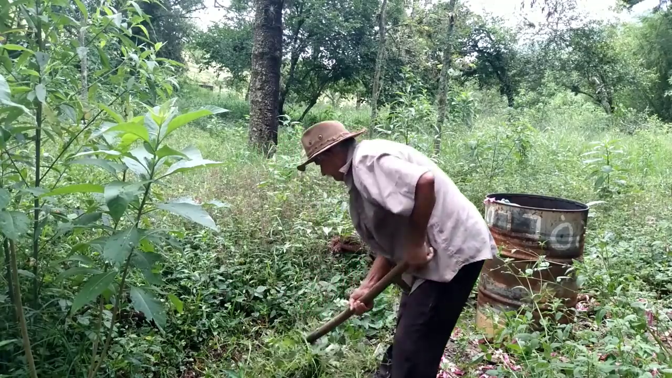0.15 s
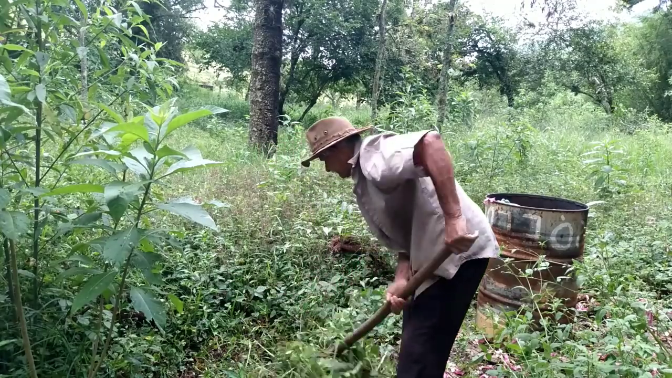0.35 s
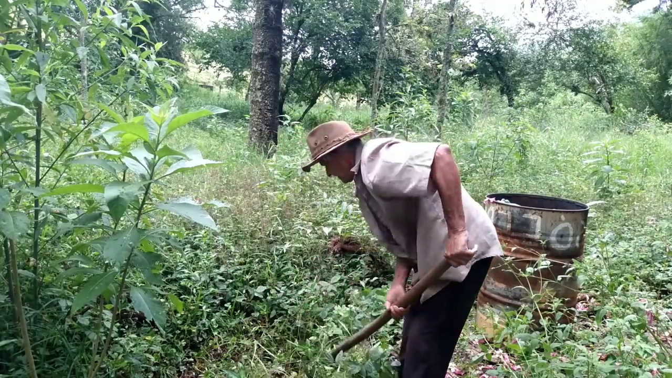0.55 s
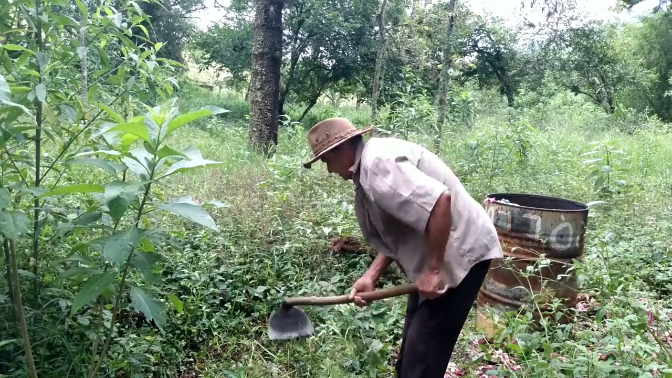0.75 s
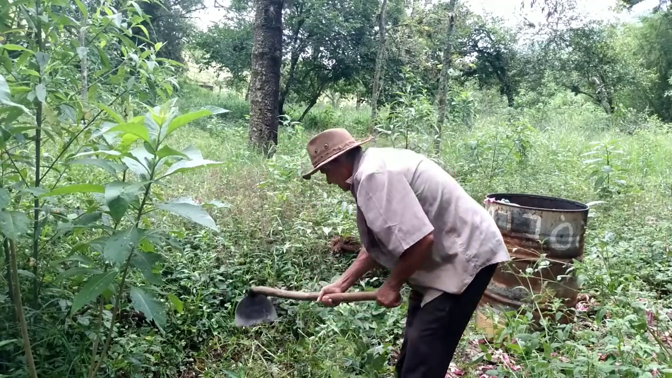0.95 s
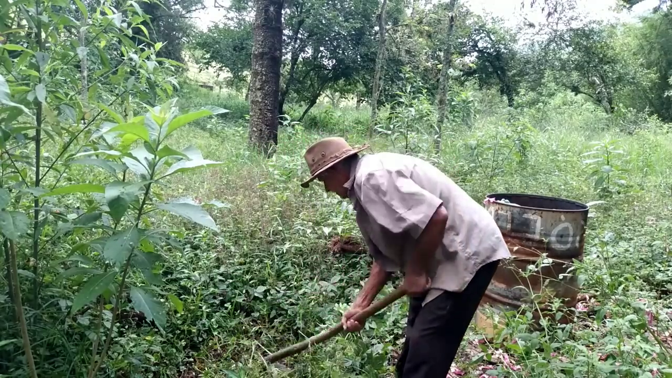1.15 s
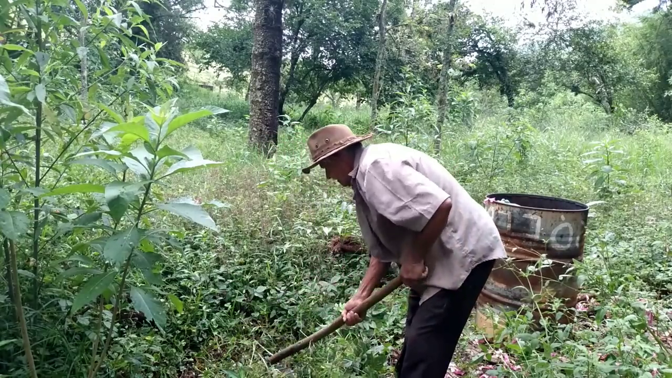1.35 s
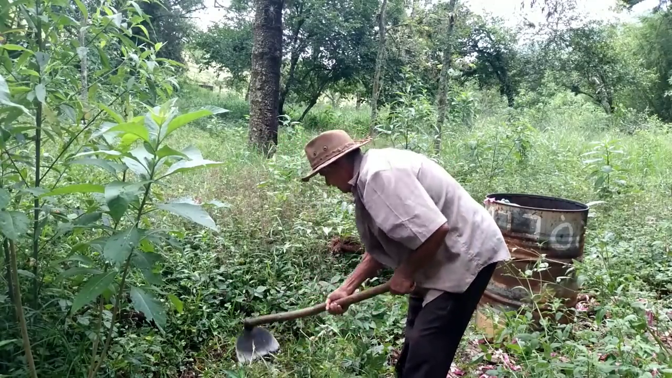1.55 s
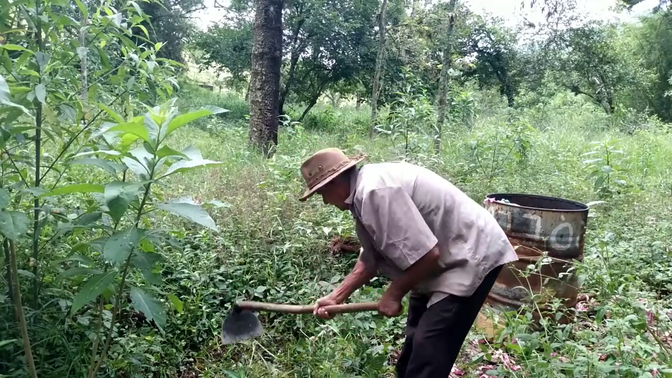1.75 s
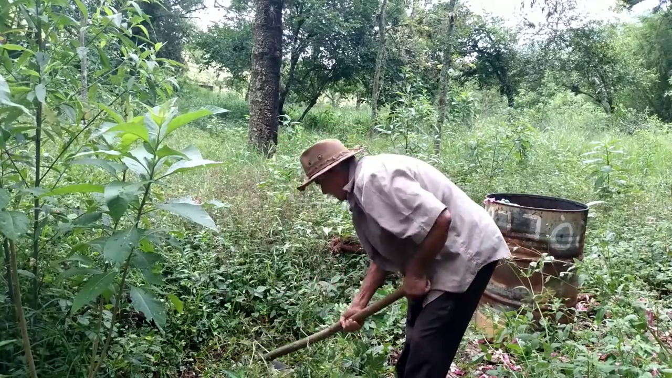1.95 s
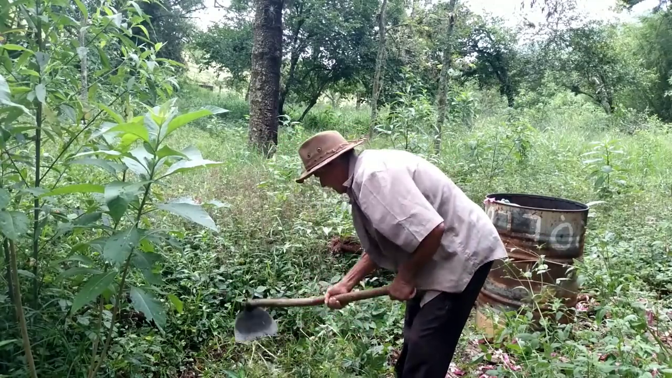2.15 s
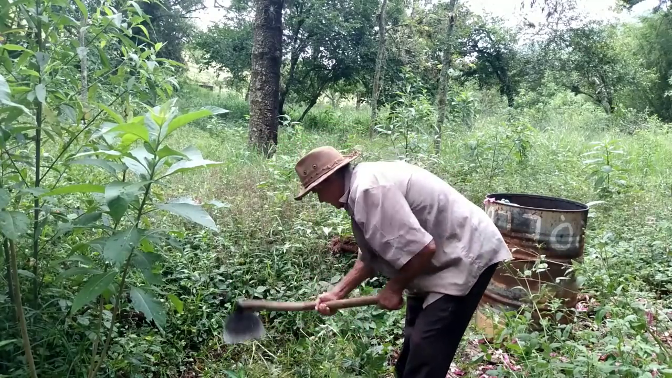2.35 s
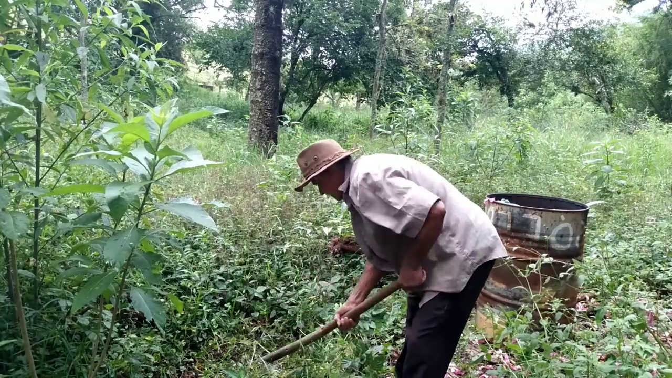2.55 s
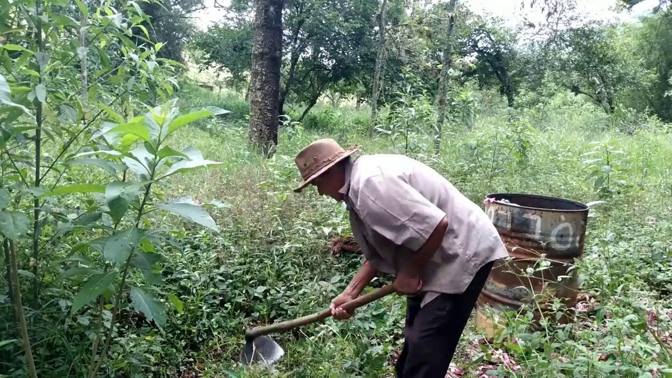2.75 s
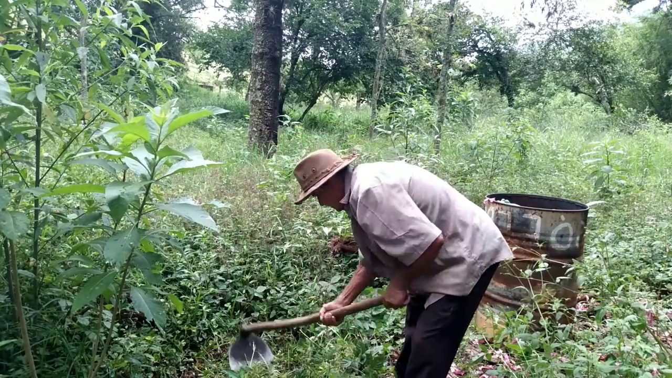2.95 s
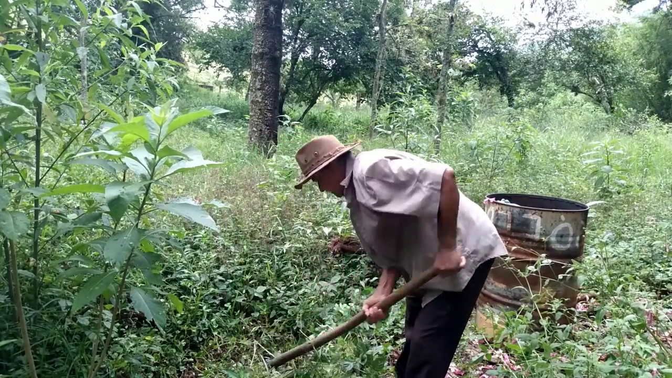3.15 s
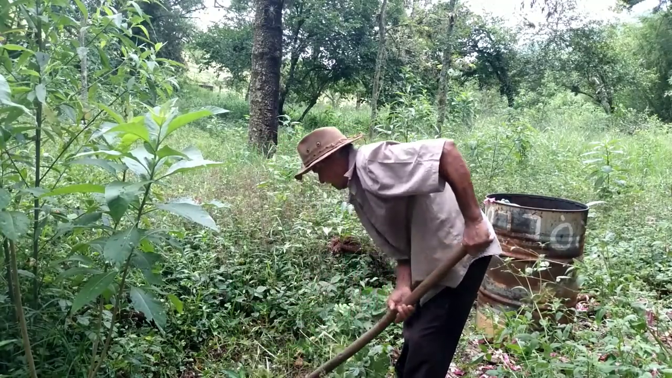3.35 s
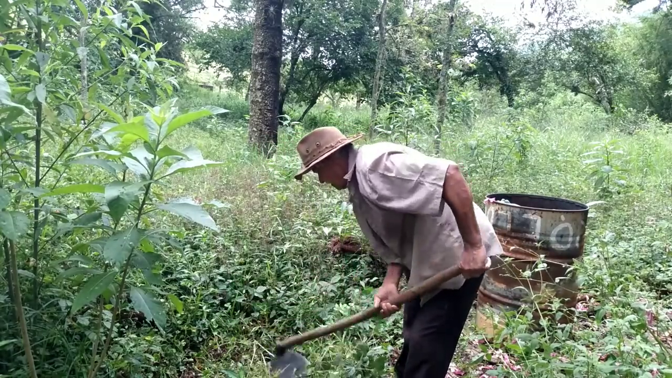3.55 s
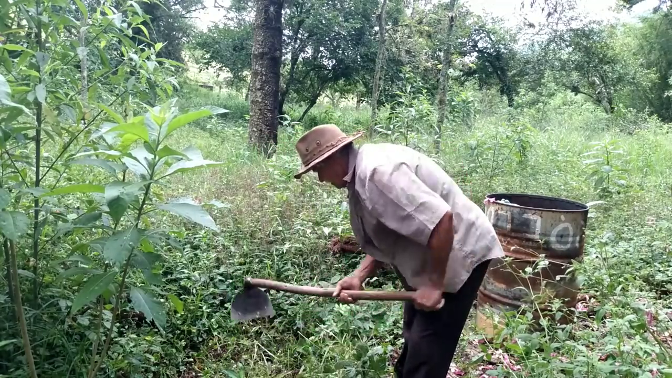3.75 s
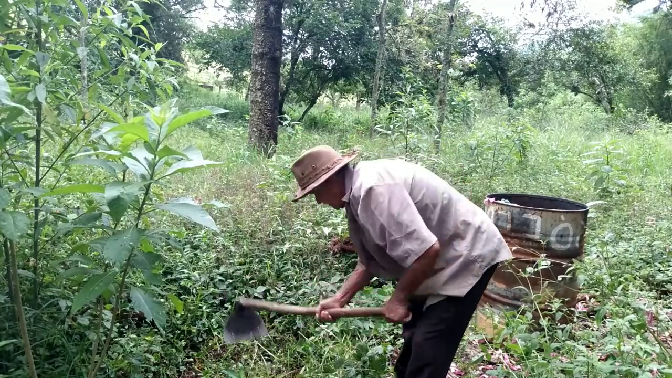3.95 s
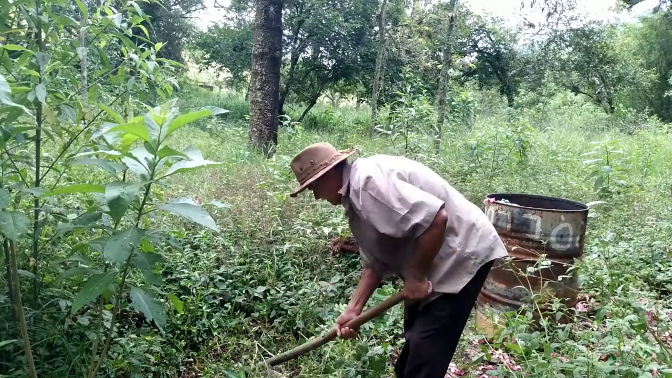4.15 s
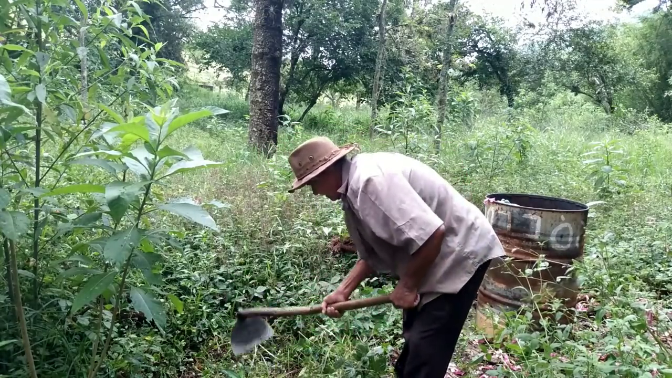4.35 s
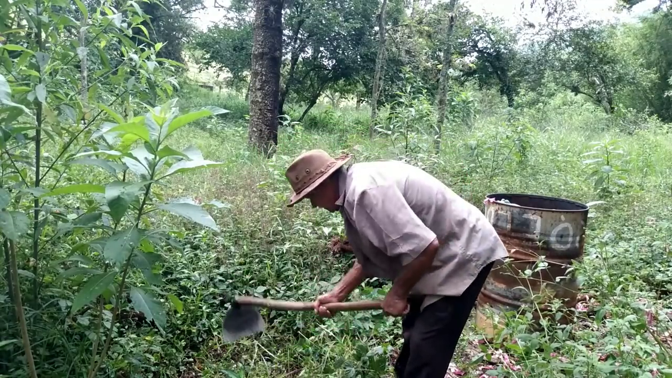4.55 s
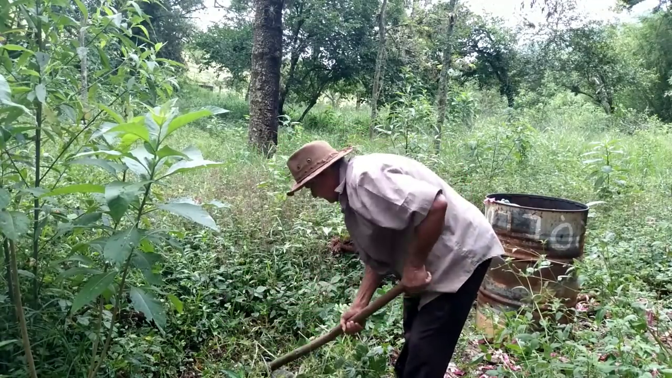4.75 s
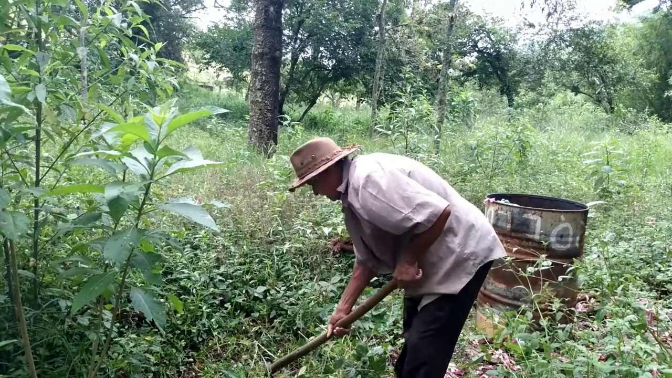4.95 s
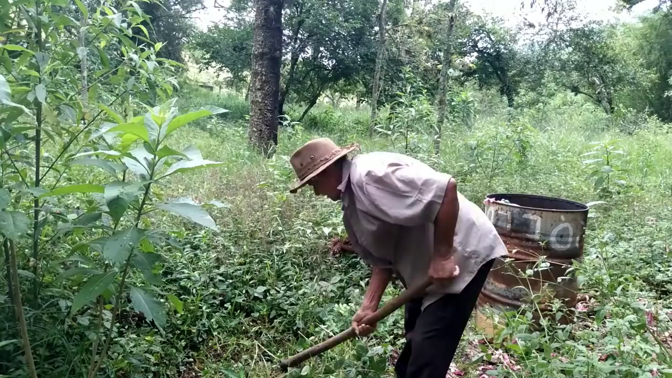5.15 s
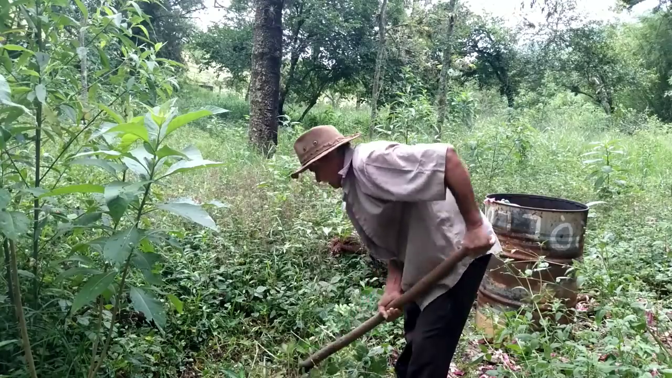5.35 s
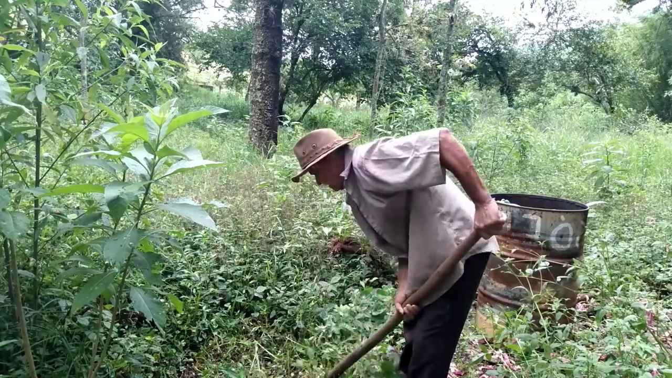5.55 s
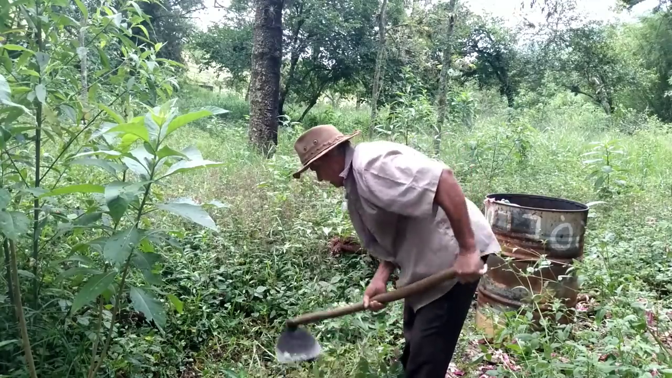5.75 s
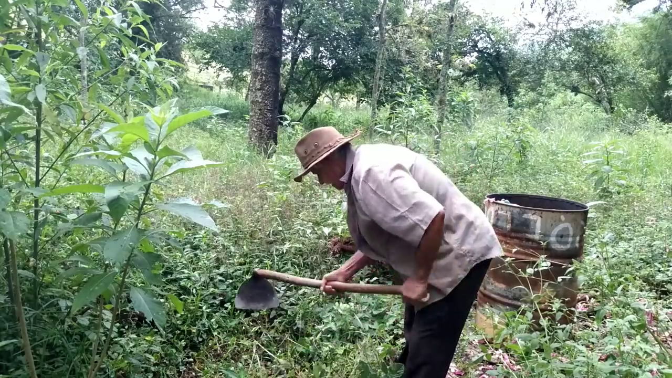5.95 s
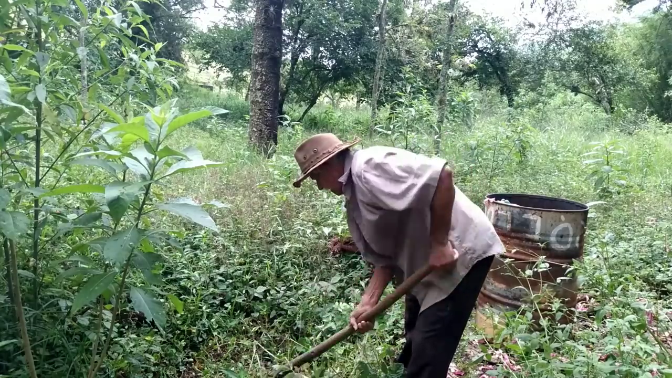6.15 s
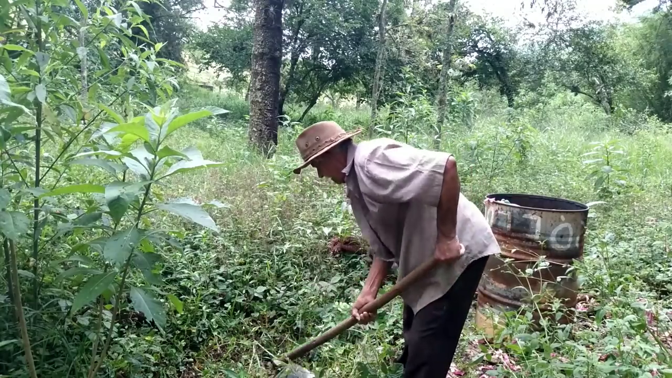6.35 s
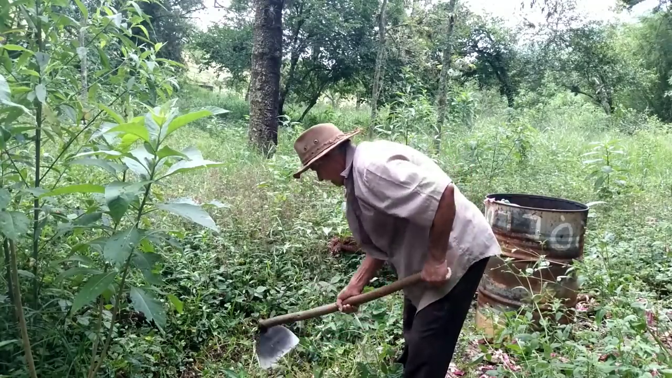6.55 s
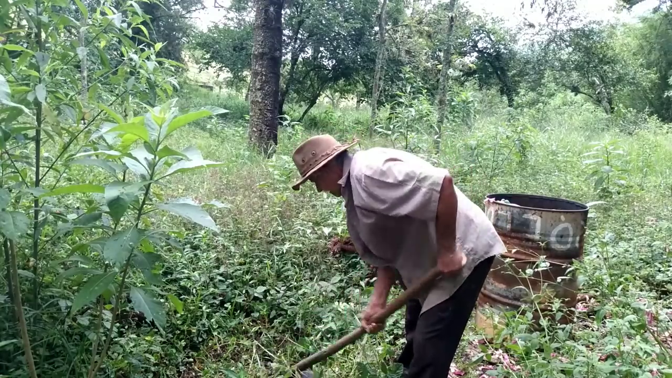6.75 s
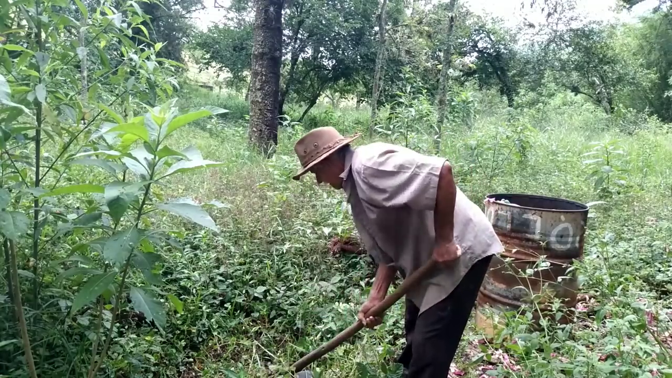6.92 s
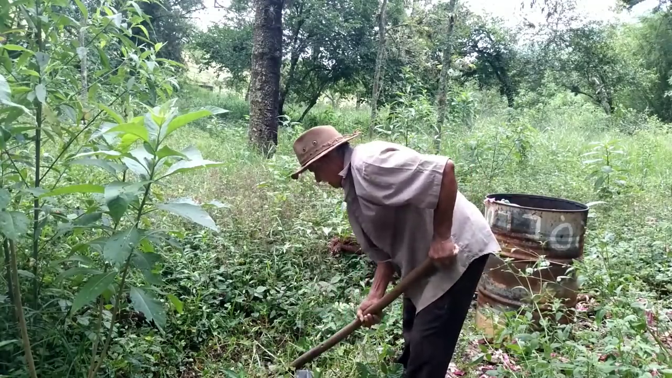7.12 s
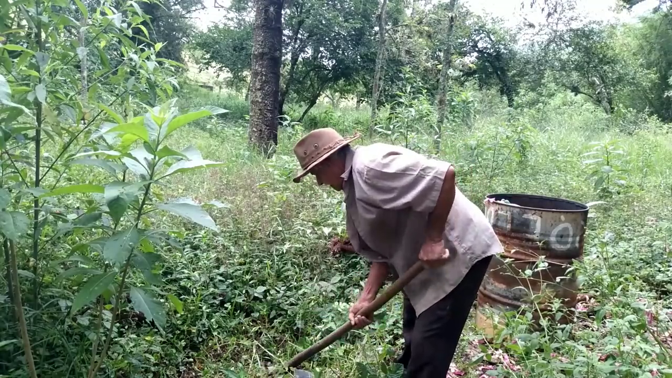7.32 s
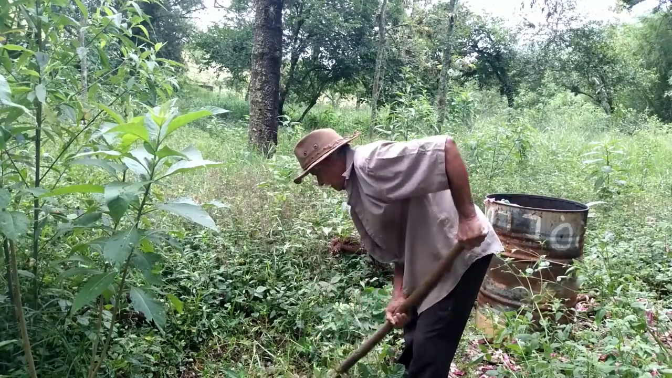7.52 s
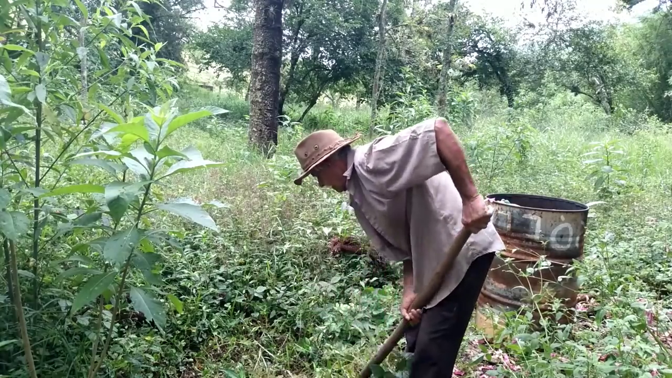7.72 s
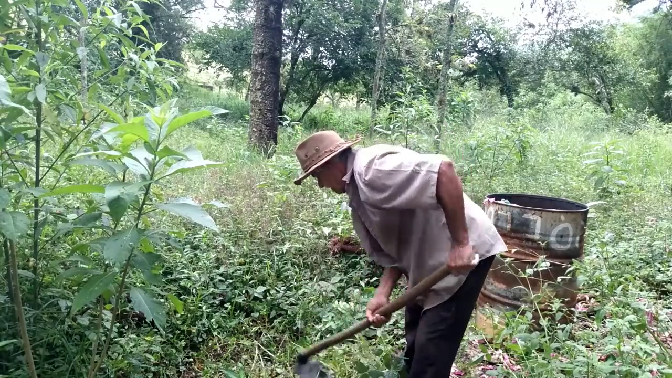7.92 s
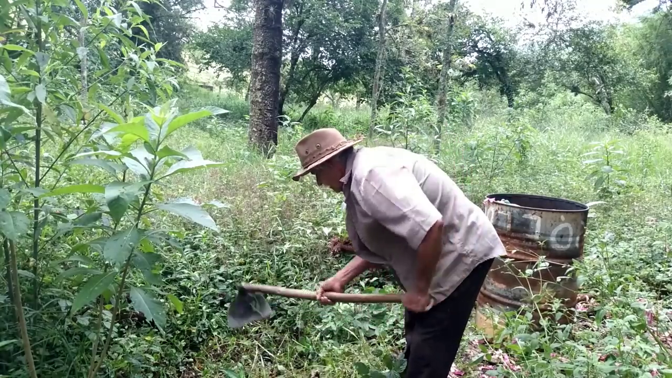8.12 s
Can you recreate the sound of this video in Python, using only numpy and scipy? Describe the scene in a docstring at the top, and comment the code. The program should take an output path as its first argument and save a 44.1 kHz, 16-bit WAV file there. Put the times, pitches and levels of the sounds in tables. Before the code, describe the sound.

Outdoors among weeds, a nearby hoe chops into damp earth seven times at an uneven pace, knocking, clanking and scattering crumbs of soil. Before, between and after the chops, the blade makes four softer grating drags through leaves, snapping stems and clinking on stones. Steady, quiet insects and a low murmur of air fill the background, with a barely audible distant bird early on.

```python
"""A hoe chops weeds out of damp soil at the edge of a wood: seven blows and four raking pulls.
Each blow swishes through grass, cuts stems, thuds, rings the head and shaft, and scatters earth.
On the pulls the blade grates through soil and leaves; stems snap, stones clink, dry stalks tick.
Behind it insects shrill, a far bird whistles and the air murmurs.
The two microphone ports colour the treble differently."""
import sys
import numpy as np
from scipy import signal
from scipy.fft import rfft, irfft, next_fast_len
from scipy.io import wavfile
from scipy.ndimage import map_coordinates

SR = 44100
rng = np.random.default_rng(int(sys.argv[2]) if len(sys.argv) > 2 else 0)


def generate_wav(sig):
    """Save sig (samples, or channels by samples) to the path in sys.argv[1] as 16-bit PCM at SR."""
    pcm = np.round(np.clip(np.atleast_2d(sig).T, -1, 1) * 32767).astype(np.int16)
    wavfile.write(sys.argv[1], SR, pcm)


N = 360738

# Noise colours, from the background bed to the blow. Each row: frequency in Hz, relative level in dB.
AIR_COLOUR = [(8, 15.5), (30, -0.5), (70, -3.5), (130, -11.5), (230, -8), (330, -14), (520, -14),
              (700, -21.5), (1100, -27.5), (4000, -25), (9000, -26.5), (16000, -27)]
CHORUS_COLOUR = [(3800, -41), (4600, -18), (5300, -5.5), (5900, -4), (6500, -10.5), (7500, -16.5),
                 (9000, -12.5), (12000, -19.5), (16000, -40.5)]
SCRAPE_COLOUR = [(40, -9), (200, -1.5), (400, -3), (550, -2), (1050, -4.5), (1350, -6), (1650, -4.5),
                 (2600, -8), (5000, -13.5), (12000, -47)]
LEAF_COLOUR = [(200, -22.5), (1200, -7), (2000, -2.5), (3200, 1), (5000, -0.5), (7500, -3.5), (10500, -8.5),
               (13000, -22.5), (16000, -30.5)]
STEM_COLOUR = [(300, -16), (1500, -10), (2700, -1), (4000, 0.5), (5500, -4), (7500, -3.5), (10000, -11),
               (13000, -26), (16000, -26)]
PUSH_COLOUR = [(40, -8.5), (90, 1), (150, -9.5), (270, -1.5), (420, -13), (700, -24), (2000, -59)]
EARTH_COLOUR = [(40, -17), (120, -11.5), (260, -4), (420, -7), (700, -7.5), (1100, 1.5), (1350, -15),
                (1650, -4.5), (2800, -9.5), (5000, -26), (12000, -48.5)]
# Stereo image of close and distant sounds. Each row: frequency in Hz, left-right coherence (1 is mono).
NEAR_IMAGE = [(130, 1), (640, 0.91), (1400, .78), (3000, 0.44), (6000, 0), (10000, 0.047)]
FAR_IMAGE = [(30, .4), (200, 0.27), (550, 0.69), (1200, .05), (4000, 0.01)]
# Swell of the higher insects and the chorus. Each row: time in seconds, base level in dB.
INSECT_SWELL = [(0, -59), (.9, -57.5), (1.599, -60), (2.8, -57.5), (4.4, -59.5), (5, -59), (5.9, -59),
                (6.6, -59.5), (7.2, -58.5)]
# The blade drags through the weeds. Each row: start in seconds, length in seconds, level in dB.
BLADE_PULLS = [(0, .35, -45), (3.032, 0.22, -42), (5.046, 0.39, -44.5), (7.404, 0.19, -45)]
# The blade lifts out of the tangle. Each row: release in seconds, leaf level in dB, ring level in dB.
BLADE_LIFTS = [(.65, -50, -60.5), (2.06, -63.5, -59), (3.56, -50.5, -59), (5.7, -53, -59),
               (6.49, -53.5, -74), (7.99, -47.5, -74)]
# Modes of the free blade and of the head damped by soil.
# Each row: pitch in Hz, relative level in dB, time to fall 60 dB in seconds.
FREE_MODES = [(638, -4, 0.58), (858, 5.5, 0.16), (1228, -1.5, 0.43), (1624, 0.5, 0.17), (2200, 2, 0.41),
              (2893, 4.5, .3), (3230, -0.5, .3), (6500, 5, 0.2)]
DAMPED_MODES = [(1080, 0, 0.022), (1207, -5, 0.026), (1519, 7.5, 0.032), (1564, 5, 0.024),
                (2076, -8, 0.063), (2396, -3, 0.053), (2530, -14.5, .05), (2619, -7, 0.051),
                (3484, -3.5, 0.039), (3890, -17, 0.016), (4370, -17.5, 0.06), (4580, -7.5, 0.06),
                (7100, -23, 0.024)]
# Sharp cracks: stems and roots break, the hoe knocks twice more just after its second blow, and clods drop
# after later blows. Each row: start in seconds, level in dB, crispness in dB.
CRACKS = [(.023, -43, -5), (1.908, -16.5, -12.5), (1.918, -23, -14.5), (1.951, -30, -10.5),
          (3.063, -32.5, -2.5), (3.081, -32.5, -1), (4.862, -45.5, -10), (5.103, -33.5, 3),
          (5.173, -34, -1), (5.255, -43.5, -4.5), (5.328, -38, 2.5), (6.23, -38, 1), (6.348, -48, -1),
          (6.816, -34.5, 10.5)]
# The blade meets a stone. Each row: start in seconds, crack level in dB, crispness in dB,
# ring level in dB, most excited frequency in Hz.
STONE_HITS = [(.049, -40.5, -3.5, -43.5, 1160), (1.982, -34, 1, -42, 4598), (2.516, -36, 4, -45, 782),
              (3.088, -25.5, -2.5, -47, 700), (4.736, -39, -2, -51, 820), (5.352, -36.5, 7.5, -41, 1520),
              (6.197, -33.5, -4, -45, 855), (7.448, -37.5, 1, -43.5, 894), (8.079, -58.5, 9, -53.5, 1150)]
# Bird notes. Each row: start in seconds, length in seconds, first and last pitch in Hz, level in dB.
BIRD_NOTES = [(0.974, 0.23, 4400, 3350, -71), (1.5, 0.11, 4120, 3350, -67), (2.284, 0.16, 4400, 3380, -67)]
# Hoe blows. Each row: start in seconds, force in dB, depth from 0 to 1, then swish, stem, thud and
# shaft faders in dB, knock pitch in Hz, clod pitch in Hz, clod fader in dB.
BLOWS = [(1.136, -22, 0.62, -29.5, -19, -27, -29, 267, 944, -32),
         (1.897, -15, 0.5, -30.5, -14.5, -19, -15.5, 207, 1055, -16),
         (2.471, -14.5, .15, -33.5, -15.5, -21, -13, 149.4, 747, -16.5),
         (4.071, -14, .3, -26, -14, -23, -16.5, 170, 986, -27.5),
         (4.685, -18.5, .8, -22.5, -20.5, -9.5, -18, 204, 1099, -21.5),
         (6.1495, -13.5, .7, -29, -10, -17, -32.5, 210, 847, -12),
         (6.7874, -16, 0.99, -26, -12, -15, -16, 196.6, 727, -7.5)]
# Dry stalks tick. Each row: start in seconds, level in dB, pitch in Hz.
STALK_TICKS = [(6.891, -45.5, 7100), (6.949, -45, 7170), (7.013, -46.5, 4240), (7.035, -44, 4150),
               (7.176, -55, 2440), (7.229, -51, 2390)]
# Treble resonances of the microphone ports. Each row: frequency in Hz, gain in dB.
LEFT_PORT_EQ = [(3800, 1.5), (6000, 3.5), (7250, 10.5), (9000, -0.5), (10500, -11), (12500, -0.5),
                (15000, 2.5)]
RIGHT_PORT_EQ = [(3800, 1), (6000, -1.5), (7300, -3), (9000, -3), (10400, 7), (12500, 1.5), (15000, -1)]


def amp(db):
    """Decibels to gain."""
    return 10 ** (np.asarray(db) / 20)


def unit(x):
    """Scale to rms 1."""
    return x / np.sqrt(np.mean(x ** 2) + 1e-20)


def along(points, hz):
    """Read a curve of (Hz, value) points on a log frequency axis."""
    freqs, values = np.transpose(points)
    return np.interp(np.log(hz + 1), np.log(freqs), values)


def wobble(rate):
    """A smooth random curve with rate knots a second."""
    knots = rng.standard_normal(int(N * rate / SR) + 4)
    return map_coordinates(knots, [np.arange(N) * rate / SR])


def filtered(x, response):
    """Shape x with a gain given as a function of frequency."""
    n = x.shape[-1]
    padded = next_fast_len(n + SR // 8)
    return irfft(rfft(x, padded) * response(np.fft.rfftfreq(padded, 1 / SR)), padded)[..., :n]


def noise(colour, image=NEAR_IMAGE, n=N, texture=1):
    """Stereo noise of rms 1 with the given colour, stereo image and fine texture."""
    def mid_side_gains(hz):
        width = np.arccos(np.clip(along(image, hz), -1, 1)) / 2
        return amp(along(colour, hz)) * [np.cos(width), np.sin(width)]
    mid, side = filtered(rng.standard_normal((2, n)) * texture, mid_side_gains)
    return unit(np.array([mid + side, mid - side]))


def crackle(colour, rate, spread_db, n=N, life_s=.0008):
    """Tiny fractures, rate a second, a few much larger than the rest."""
    sizes = amp(spread_db * np.minimum(rng.exponential(size=n), 4))
    fractures = sizes * (rng.random(n) < rate / SR)
    power = signal.lfilter([1], [1, -np.exp(-1 / (life_s * SR))], fractures ** 2)
    return noise(colour, n=n, texture=np.sqrt(power))


def burst(t, rise, hold, t60):
    """An envelope that rises, holds and dies away; times in seconds."""
    return (1 - np.exp(-np.maximum(t, 0) / rise)) * amp(-60 * np.maximum(t - hold, 0) / t60)


def ring(t, hz, t60, rise=.0014):
    """One struck mode."""
    return np.sin(2 * np.pi * hz * t) * burst(t, rise, 0, t60)


def add(track, start, sound):
    """Mix a sound into the track at start seconds."""
    i = max(round(start * SR), 0)
    track[:, i:i + sound.shape[-1]] += sound[..., :N - i]


def air():
    """A low, wide bed of air that barely wavers."""
    return amp(-47.5 + .31 * wobble(2)) * noise(AIR_COLOUR, FAR_IMAGE)


def shrill(hz, width_hz, flutter_db):
    """Many insects of one kind merge into a narrow, fluttering band."""
    band = filtered(rng.standard_normal((2, N)), lambda f: 1 / (1 + 2j * (f - hz) / width_hz) ** 2)
    return unit(band * amp(flutter_db * wobble(45)))


def insects():
    """Two kinds of insect sing over a distant chorus, which swells and ebbs with the higher kind."""
    swell = amp(np.interp(np.arange(N) / SR, *np.transpose(INSECT_SWELL)))
    lower = amp(-58 + 1.6 * wobble(.86)) * shrill(4805, width_hz=380, flutter_db=1.5)
    higher = amp(2.5) * shrill(5750, width_hz=480, flutter_db=2.1)
    chorus = amp(-1.5) * noise(CHORUS_COLOUR, FAR_IMAGE)
    return lower + swell * (higher + chorus)


def on_steel(x, width_hz=45, wet=.16):
    """Grit sliding on the blade sounds its modes, widened by the contact."""
    def resonances(f):
        return sum(amp(db) / (1 + 2j * (f - hz) / width_hz) for hz, db, _ in FREE_MODES)
    return filtered(x, lambda f: 1 + wet * resonances(f))


def pulls(grip_s=.016, gather_db_per_s=20, lift_db_per_s=34, lift_t60=.44):
    """The blade grates over soil while leaves pile up and rustle; lifted free, it rings."""
    t = np.arange(N) / SR
    soil, leaves, rings = np.zeros(N), np.zeros(N), np.zeros((2, N))
    for start, length, db in BLADE_PULLS:
        gathered_db = gather_db_per_s * np.minimum(t - start - length, 0)
        soil += amp(db) * burst(t - start, grip_s, length, t60=.65)
        leaves += amp(db + 4 + gathered_db) * burst(t - start, grip_s, length, t60=.74)
    for release, db, ring_db in BLADE_LIFTS:
        since = t - release
        brushing = amp(db + np.minimum(lift_db_per_s * since, -60 * since / lift_t60))
        leaves = np.hypot(leaves, brushing)
        add(rings, release + .04, ping(ring_db, centre_hz=2230, octaves=.28))  # the last weeds let go
    catching = amp(.81 * wobble(35))  # the blade catches and slips
    grating = amp(-3.5) * soil * crackle(SCRAPE_COLOUR, rate=1800, spread_db=3.6)
    rustle = leaves * crackle(LEAF_COLOUR, rate=3000, spread_db=1.4)
    return on_steel(catching * (grating + rustle)) + rings


def clank(t, scatter_db=3, stagger_s=.003, detune=.006):
    """The head's damped modes build up as it digs in; high ones reach the two ports unalike."""
    out = np.zeros((2, len(t)))
    for hz, db, t60 in DAMPED_MODES:
        late = stagger_s * rng.random() + rng.normal(0, .00005, (2, 1))
        gain = amp(db + scatter_db * rng.normal())
        out += gain * ring(t - late, hz * (1 + detune * rng.normal()), t60)
    return out


def crack(db, crisp_db):
    """A short crack with a dull body and a crisp edge, which rings the hoe a little."""
    n = SR // 6
    t = np.arange(n) / SR
    dull = amp(-2) * burst(t, .00082, .0053, .082) * noise(SCRAPE_COLOUR, n=n)
    crisp = amp(crisp_db - 1.5) * burst(t, .0006, .0024, .091) * crackle(STEM_COLOUR, 1700, 1.3, n)
    return amp(db) * (on_steel(dull + crisp) + amp(-13.5) * clank(t))


def snaps():
    """Stems and roots break against the blade, the hoe knocks again after a blow, and clods drop: one crack
    each."""
    out = np.zeros((2, N))
    for start, db, crisp_db in CRACKS:
        add(out, start, crack(db, crisp_db))
    return out


def ping(db, centre_hz, octaves=.53):
    """Out of the soil the steel rings on; the point of contact favours some of its modes."""
    out, t = np.zeros((2, SR // 2)), np.arange(SR // 2) / SR
    for hz, mode_db, t60 in FREE_MODES:
        favour = np.exp(-.5 * (np.log2(hz / centre_hz) / octaves) ** 2)
        late = rng.normal(0, .00004, (2, 1))
        out += amp(db + mode_db) * favour * ring(t - late, hz, t60)
    return out


def stones():
    """Stones clink on the blade: a crack for the attack, ringing steel for the tail."""
    out = np.zeros((2, N))
    for start, db, crisp_db, ring_db, centre_hz in STONE_HITS:
        add(out, start, crack(db, crisp_db))
        add(out, start, ping(ring_db, centre_hz))
    return out


def bird():
    """A far bird's faint whistles drop quickly and level off."""
    out = np.zeros((2, N))
    for start, length, from_hz, to_hz, db in BIRD_NOTES:
        progress = np.linspace(0, 1, int(length * SR))
        hz = to_hz + (from_hz - to_hz) * (1 - progress) ** 2
        arch = np.sqrt(np.abs(np.sin(np.pi * progress)))
        add(out, start, amp(db) * arch * np.sin(2 * np.pi * np.cumsum(hz) / SR))
    return out


def chops(lead_s=.04, contact_s=.00041, swish_s=.021):
    """The hoe swishes through grass and bites into the ground, then earth and leaves settle."""
    out, n = np.zeros((2, N)), SR * 3 // 4
    t = np.arange(n) / SR - lead_s - contact_s
    entering = np.clip(1 + t / swish_s, 0, 1) ** 1.4 * (t < 0)  # ever more grass meets the blade
    for start, force_db, depth, swish_db, stems_db, thud_db, shaft_db, knock_hz, clod_hz, clod_db in BLOWS:
        ground_db = force_db + 18 * depth  # a deep blow knocks harder
        head_db = force_db + 3.5 - 10 * depth ** 2  # and damps the steel
        grass = crackle(LEAF_COLOUR, 2900, 1.5, n) + .41 * noise(SCRAPE_COLOUR, n=n)
        swish = amp(swish_db - 1.5) * entering * grass

        thud = amp(thud_db) * ring(t, hz=78, t60=.057, rise=.0026)
        knock = amp(ground_db - 7) * ring(t, knock_hz, t60=.064, rise=.0032)
        soil_push = amp(ground_db - 17.5) * burst(t, .0017, .009, .06) * noise(PUSH_COLOUR, n=n)
        shaft = amp(shaft_db + 7.5) * ring(t, hz=535, t60=.06, rise=.0017)
        clod = amp(clod_db + 5.5) * ring(t, clod_hz, t60=.045)
        head = amp(head_db) * clank(t)
        earth = amp(force_db + 4.5) * burst(t, .0012, .0029, .042) * noise(EARTH_COLOUR, n=n)
        stems = amp(stems_db) * burst(t, .0003, .003, .05) * crackle(STEM_COLOUR, 3200, 2.2, n)
        bite = thud + knock + soil_push + shaft + clod + head + earth + stems

        crumbs = amp(force_db - 23) * burst(t, .018, .023, .52) * crackle(SCRAPE_COLOUR, 1200, 2.8, n)
        leaves = amp(stems_db - 20.5) * burst(t, .0054, .023, .36) * crackle(LEAF_COLOUR, 2300, 1.8, n)
        # weeds brush the blade as it comes up
        brushing = amp(-52.5) * burst(t, .055, .16, .65) * crackle(LEAF_COLOUR, 1500, 2.2, n)
        tail = off_ground(on_steel(crumbs) + leaves + brushing)
        add(out, start - lead_s, swish + bite + tail)
    return out


def ticks():
    """Dry stalks tick, each with a bright crack and a pitch of its own."""
    out, n = np.zeros((2, N)), SR // 6
    envelope = burst(np.arange(n) / SR, rise=.0016, hold=.0051, t60=.052)
    for start, db, hz in STALK_TICKS:
        stalk_colour = [(hz / 2, -40), (hz * .88, -20), (hz, 0), (hz * 1.13, -20), (hz * 2, -40)]
        add(out, start, amp(db) * envelope * noise(stalk_colour, n=n))
        add(out, start, crack(db - 7, crisp_db=11.5))
    return out


def off_ground(x, delay_s=.00117, bounce=.13):
    """Sound from just above the soil arrives twice, which gives it a hollow colour."""
    return filtered(x, lambda hz: (1 + bounce * np.exp(-2j * np.pi * hz * delay_s)) / np.hypot(1, bounce))


def from_left(x, lead_s=.00003):
    """The hoe works left of centre, so its sound reaches the left port first."""
    return filtered(x, lambda hz: np.exp(1j * np.pi * hz * lead_s * np.array([[1], [-1]])))


def scene():
    """The hoe up front; air, insects and the bird behind it."""
    bed = air() + insects() + bird()
    raking = off_ground(pulls() + snaps() + stones() + ticks())
    return bed + from_left(raking + chops())


def record(dry, top_hz=16000):
    """Each port rings in the treble, peaks past full scale clip, and the top end cuts off steeply."""
    coloured = filtered(dry, lambda hz: amp([along(LEFT_PORT_EQ, hz), along(RIGHT_PORT_EQ, hz)]))
    return filtered(np.clip(coloured, -1, 1), lambda hz: hz < top_hz)


dry = scene()
out = record(dry)
generate_wav(out)
```